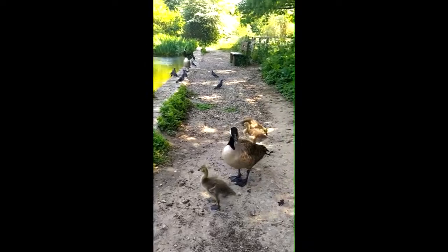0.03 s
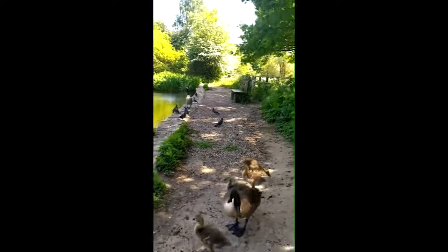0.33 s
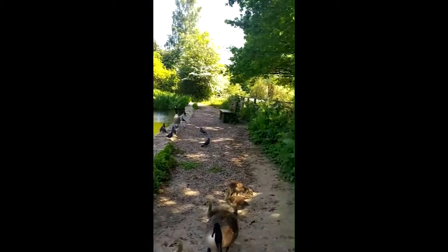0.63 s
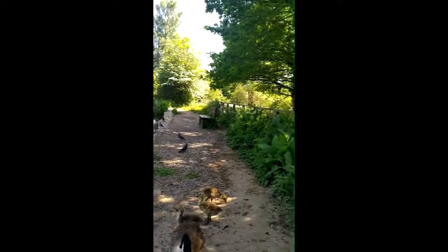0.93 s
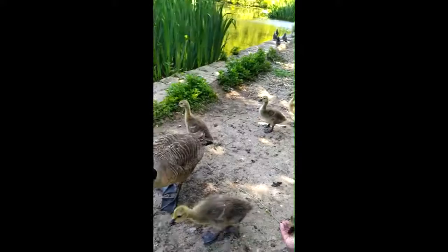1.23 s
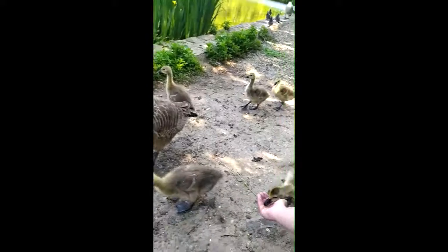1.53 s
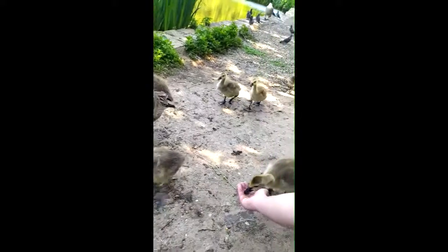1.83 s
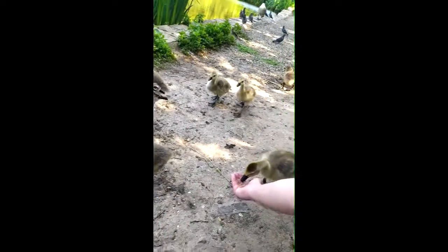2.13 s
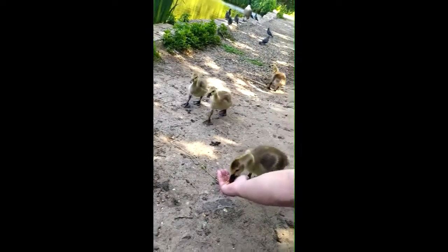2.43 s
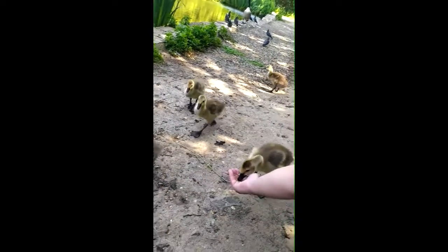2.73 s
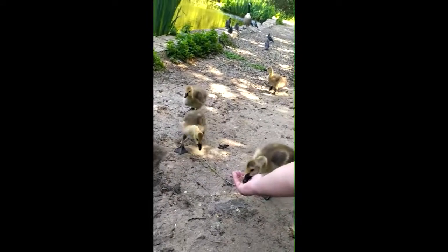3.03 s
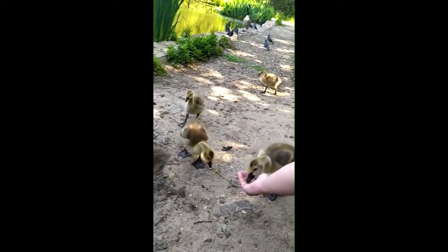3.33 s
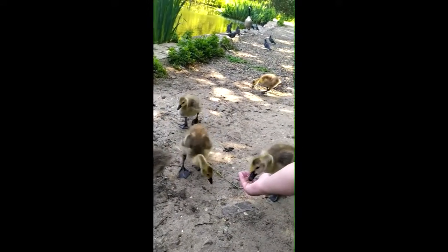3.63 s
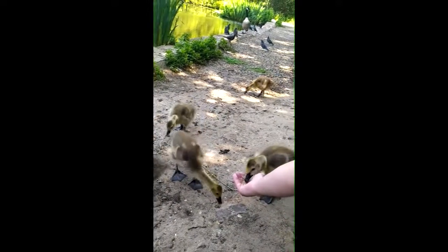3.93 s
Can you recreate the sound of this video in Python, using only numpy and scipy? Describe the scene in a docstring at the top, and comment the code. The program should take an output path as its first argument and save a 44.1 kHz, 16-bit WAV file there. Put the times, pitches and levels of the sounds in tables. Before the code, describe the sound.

A breathy goose hiss gives way suddenly to thin, wavering gosling peeps outdoors by a pond. Faint rough caws, light scuffs and clicks of grit come through as gusts rumble on the microphone.

```python
"""A goose walks up a gritty pond-side path and hisses, forcing air through its open beak.
After an abrupt cut, goslings peep and trill in thin, unsteady tones and nibble feed from a hand,
while a harsh-voiced bird, perhaps a crow, rattles rough pulses through its throat in the trees.
Throughout, grit snaps and wind buffets the two microphone ports over distant air and a fine rustle."""
import sys
import numpy as np
from scipy import signal
from scipy.fft import rfft, irfft, next_fast_len
from scipy.io import wavfile
from scipy.ndimage import map_coordinates

SR = 44100
rng = np.random.default_rng(int(sys.argv[2]) if len(sys.argv) > 2 else 0)


def wav_out(sig):
    """Save sig, one row per channel (or a flat mono array), as 16-bit PCM at SR to the path in sys.argv[1]."""
    wavfile.write(sys.argv[1], SR, np.round(np.clip(np.atleast_2d(sig).T, -1, 1) * 32767).astype(np.int16))


N = 176400
T = np.arange(N) / SR
CUT_S, GAP_S = 1.264, .009  # the cut from goose to goslings

# Tone of distant trees and town: freq_hz, gain_db
AIR_EQ = [(100, 11.5), (400, 2.5), (850, 11), (1300, 2.5), (2500, -1.5), (5000, -7.5), (16000, -53.5)]
# Tone of the leafy rustle: freq_hz, gain_db
RUSTLE_EQ = [(1000, -1), (3000, -3.5), (5500, -1), (8500, 4.5), (11000, 3), (15500, 0)]
# Fader ride of the rustle: time_s, left_db, right_db
RUSTLE_RIDE = [(0, -49, -47.5), (.5, -49, -50), (1.3, -44, -47.5), (1.6, -46, -50), (1.78, -46, -49),
               (1.95, -45.5, -42.5), (2.07, -41.5, -44.5), (2.12, -48, -52), (2.4, -46.5, -48),
               (2.6, -48.5, -52), (3.1, -49.5, -52.5), (3.7, -53, -56), (4, -51.5, -54.5)]
# Tone of the wind rumble: freq_hz, gain_db
RUMBLE_EQ = [(20, -28), (32, -9), (48, 5), (70, 5), (130, -1.5), (200, -13.5), (300, -24), (600, -35),
             (1500, -55)]
# Fader ride of the rumble: time_s, left_db, right_db
RUMBLE_RIDE = [(0, -27, -31.5), (1.2, -30.5, -30.5), (1.6, -31.5, -36.5), (1.85, -40, -34),
               (2.1, -33.5, -28.5), (2.6, -43.5, -36.5), (2.9, -29.5, -31), (3.5, -38, -34),
               (4, -38.5, -38)]
# Tone of the small eddies between gusts: freq_hz, gain_db
EDDY_EQ = [(20, -38), (60, 12.5), (150, -0.5), (250, -4), (450, -26), (1000, -44)]
# Gusts striking a port: start_s, length_s, level_db, brightness_hz, port (0 left, 1 right)
GUST_CUES = [(.045, 0.023, -31, 230, 0), (.1, 0.3, -31, 141, 0), (0.696, 0.085, -19.5, 189, 0),
             (0.787, 0.089, -19, 295, 0), (0.872, 0.11, -20.5, 154, 0), (0.985, 0.073, -24.5, 115, 0),
             (1.065, 0.046, -17.5, 318, 0), (1.116, 0.084, -13, 470, 0), (1.197, 0.019, -13.5, 430, 0),
             (1.221, 0.046, -15.5, 458, 0), (2.025, 0.03, -28, 109, 0), (2.318, 0.073, -23, 175.7, 0),
             (2.703, .025, -30.5, 89, 0), (3.003, 0.036, -33, 140.7, 0), (0.082, 0.1, -34, 214, 1),
             (0.138, 0.054, -18.5, 292, 1), (0.439, 0.032, -18, 150, 1), (0.642, 0.021, -15, 119, 1),
             (0.688, 0.07, -18, 84.5, 1), (0.902, 0.041, -13, 140, 1), (0.943, 0.018, -14, 215, 1),
             (0.962, 0.1, -26, 110, 1), (1.012, 0.027, -13, 245, 1), (1.336, 0.11, -17.5, 166, 1),
             (1.418, .016, -20.5, 240, 1), (1.868, 0.042, -25.5, 79, 1), (1.968, 0.22, -20.5, 89, 1),
             (2.019, 0.021, -18, 215, 1), (2.142, 0.031, -16, 118, 1), (2.242, 0.035, -28, 79, 1),
             (2.345, 0.042, -25.5, 118.7, 1), (2.432, 0.074, -26.5, 69.6, 1), (2.612, 0.031, -22, 76, 1),
             (2.71, 0.033, -27.5, 78, 1), (2.805, 0.062, -21, 74, 1), (3.184, 0.025, -24.5, 146, 1),
             (3.223, 0.027, -23, 80, 1), (3.492, 0.028, -21, 82, 1)]
# Snaps of grit, and from 2.18 s on mostly sharp nibbles of goslings' bills: start_s, level_db,
# left_over_right_db
SNAP_CUES = [(.092, -35, 16), (0.186, -29.5, 1), (0.2471, -26, 17), (0.3176, -29.5, 21), (0.379, -31.5, 18),
             (0.5, -38, 12), (0.522, -37, 5), (0.999, -21, 8), (1.3996, -27, 11), (1.4477, -28, 20),
             (1.854, -33, 7.5), (2.184, -38, 10), (2.354, -35, 1), (2.5823, -37, 16), (2.731, -40, 11),
             (2.834, -38.5, 9.5), (3.094, -39, 5), (3.445, -35.5, 14), (3.5744, -41, 8), (3.6284, -35.5, 5),
             (3.7148, -40, 3), (3.9144, -46, 9.5), (3.959, -41, 9)]
# Tone of a snap: freq_hz, gain_db
SNAP_EQ = [(1000, -18), (2800, -3), (4000, -4), (8000, 5.5), (12000, 6), (16000, -2.5)]
# Webbed feet scuffing and bills nibbling: start_s, length_s, level_db
SCUFF_CUES = [(0.051, 0.022, -46.5), (0.09, 0.02, -43), (0.109, 0.055, -50), (0.233, 0.019, -46.5),
              (1.387, 0.056, -45.5), (1.558, 0.033, -54), (1.654, 0.065, -44.5), (1.773, 0.23, -54),
              (3.216, 0.024, -48.5), (3.266, 0.023, -50.5), (3.328, 0.03, -49), (3.38, 0.028, -52),
              (3.447, 0.011, -51), (3.497, 0.02, -52.5), (3.571, 0.018, -52), (3.863, 0.14, -57.5)]
# Tone of scuffs and nibbles: freq_hz, gain_db
SCUFF_EQ = [(800, -2), (2500, 1.5), (4000, 2), (7000, 7.5), (10000, 11.5), (13000, -1), (16000, -30)]
# Caws: start_s, length_s, pitch_hz, level_db, roughness, lower_resonance_hz, upper_resonance_db
CAW_CUES = [(1.245, 0.22, 378.3, -49.5, 0.75, 1120, -12.5), (1.472, 0.43, 418, -52.5, 0.96, 1260, -35),
            (1.818, 0.14, 372, -46, 0.62, 1346, -8), (1.952, .13, 363.2, -51.5, 0.85, 1800, -27),
            (2.934, 0.103, 356, -57.5, .85, 1670, -3), (3.023, .1, 350, -55.5, 1.1, 1780, -12),
            (3.128, 0.085, 343.5, -58, 1, 1620, -22)]
# Resonances of the crow's throat: freq_hz, gain_db
CROW_EQ = [(400, -31), (750, -7), (950, -25), (1120, -3.5), (1450, 1), (1850, 3), (2100, -2.5), (2400, -6),
           (2700, -5.5), (3300, -6), (4000, -25), (8000, -25)]
# Resonances of a gosling's throat: freq_hz, gain_db
GOSLING_EQ = [(910, 5), (1250, 1), (1480, 4), (1700, 0), (1930, 5.5), (2150, -3), (2400, -12), (2900, 5),
              (3400, 4), (4600, -20)]
# A gosling's harmonics, fundamental first: gain_db
GOSLING_HARMONICS = [0, -22, -34]
# Contour of the trill: time_s, pitch_hz, level_db
TRILL_CONTOUR = [(1.835, 1745, -49), (1.903, 1880, -47), (1.934, 1850, -43.5), (1.968, 1792, -41.5),
                 (2.008, 1717, -42), (2.038, 1553, -48.5), (2.074, 1370, -51)]
# Gosling peeps: start_s, rise_s, fall_s, first_hz, top_hz, last_hz, level_db, left_over_right_db
PEEP_CUES = [(1.335, 0.11, 0.067, 1450, 2350, 1123, -41, 3),
             (1.59, 0.1, 0.055, 1480, 2446, 1337, -39.5, 0.5),
             (2.159, 0.06, .052, 1034, 1400, 1030, -57.5, -3),
             (2.336, 0.059, 0.061, 1134, 1563, 1230, -52, -1),
             (2.497, .064, 0.07, 1064, 1557, 1240, -52.5, 4),
             (2.675, 0.047, 0.072, 1136, 1630, 1235, -45.5, 12),
             (2.854, 0.049, 0.049, 1090, 1705, 1080, -45.5, 13)]
# Resonances of the goose's open beak: freq_hz, gain_db
BEAK_EQ = [(1760, -16), (3000, -18), (4490, -7), (5050, -9), (5570, -6.5), (7050, -6.5), (8280, 1),
           (10200, 5.5), (11100, 1), (13300, -2), (15800, -12)]
# Fader ride of the hiss: time_s, level_db
HISS_RIDE = [(.52, -63), (.555, -45.5), (.72, -42.5), (.89, -44.5), (.93, -40), (.99, -41.5), (1.03, -41),
             (1.075, -42), (1.11, -46), (1.27, -45)]
# Treble roll-off of the right port: freq_hz, gain_db
RIGHT_PORT_EQ = [(1000, 0), (6000, 0), (10000, -6), (12500, -9), (16000, -18)]


def amp(db):
    """Decibels to gain."""
    return 10 ** (np.asarray(db) / 20)


def unit(x):
    """Scale to rms 1."""
    return x / np.sqrt(np.mean(x ** 2, axis=-1, keepdims=True) + 1e-20)


def eq_gain(eq, hz):
    """Gain of an EQ curve at hz, read on a log frequency axis."""
    freq_hz, gain_db = np.transpose(eq)
    return amp(np.interp(np.log(hz + 1), np.log(freq_hz + 1), gain_db))


def curves(rows):
    """One automation curve for each column after the time."""
    time_s, *columns = np.transpose(rows)
    return np.array([np.interp(T, time_s, column) for column in columns])


def wobble(rate):
    """A smooth random curve, rate knots a second."""
    return map_coordinates(rng.standard_normal(int(N * rate / SR) + 4), [T * rate / SR])


def filtered(x, response):
    """Filter x by a function of frequency."""
    n = x.shape[-1]
    padded = next_fast_len(n + 8192)
    return irfft(rfft(x, padded) * response(np.fft.rfftfreq(padded, 1 / SR)), padded)[..., :n]


def noise(eq):
    """Two unrelated channels of coloured noise, rms 1."""
    return unit(filtered(rng.standard_normal((2, N)), lambda hz: eq_gain(eq, hz)))


def window(start, length, edge_s):
    """Smooth attack, hold and release."""
    inside_s = np.minimum(T - start, start + length - T)
    return np.sin(np.pi / 2 * np.clip(inside_s / edge_s + .5, 0, 1)) ** 2


def pan(left_over_right_db):
    """Left and right gains of mean power 1."""
    gains = amp([[left_over_right_db / 2], [-left_over_right_db / 2]])
    return gains / np.sqrt(np.mean(gains ** 2))


def ambience():
    """A bed of distant air and a fine, crackly rustle."""
    crackle = unit(amp(1.8 * wobble(500) + 1.6 * wobble(45)))
    return amp(-57) * noise(AIR_EQ) + noise(RUSTLE_EQ) * amp(curves(RUSTLE_RIDE)) * crackle


def wind(attack_s=.01116, fade_s=.017, slope_db=10.5, low_cut_hz=44.4):
    """A restless rumble on both ports; each lumpy gust strikes one port and brightens as it surges."""
    rumble = unit(noise(RUMBLE_EQ) * amp(3.5 * np.array([wobble(18), wobble(18)])))
    eddies = unit(noise(EDDY_EQ) * amp(6 * np.minimum([wobble(45), wobble(45)], 2)))
    out = rumble * amp(curves(RUMBLE_RIDE)) + amp(-46.5) * eddies
    for start, length, db, bright_hz, port in GUST_CUES:
        attack = np.interp(T, [start - attack_s / 2, start + attack_s / 2], [0, 1])
        envelope = attack * np.clip((start + length - T) / fade_s + .5, 0, 1)
        on = np.flatnonzero(envelope)
        tilt = lambda hz: amp(-slope_db * hz / bright_hz) * hz ** 4 / (hz ** 4 + low_cut_hz ** 4)
        turbulence = filtered(rng.standard_normal(SR // 2), tilt)
        lows = filtered(turbulence, lambda hz: 1 / (1 + (hz / bright_hz) ** 4))[:len(on)]
        highs = turbulence[:len(on)] - lows
        surge = unit(np.abs(np.hanning(len(on))) ** .5 * amp(3 * wobble(110)[on]))
        gust = unit((lows + highs * surge) * envelope[on])
        gate = (start > CUT_S) | (T[on] < CUT_S)  # no gust carries over the cut
        out[int(port), on] += amp(db) * gust * gate
    return out


def grit(snap_t60_s=.018, snap_trim_db=-1.5):
    """Single bright snaps of grit and sharp nibbles, and grainy scuffs and nibbles off to the left."""
    snaps = sum(amp(db + snap_trim_db - 60 * np.abs(T - start) / snap_t60_s) * (T >= start) * pan(side)
                for start, db, side in SNAP_CUES)
    strokes = sum(amp(db) * window(start, length, edge_s=.002) for start, length, db in SCUFF_CUES)
    grains = unit(amp(6 * np.minimum(wobble(700), 2)))
    return snaps * noise(SNAP_EQ) + strokes * grains * noise(SCUFF_EQ) * pan(12.5)


def tree_echo(x, t60_s=.32, predelay_s=.004):
    """A short scattered echo from the bank and trees."""
    t = T[:SR // 2]
    tail = rng.standard_normal((2, len(t))) * amp(-60 * t / t60_s) * (t > predelay_s)
    return signal.fftconvolve(x.mean(0)[None], tail / np.linalg.norm(tail[0]), axes=1)[:, :N]


def resonance(source, centre_hz, width_hz):
    """The source ringing in one throat resonance, rms 1."""
    return unit(filtered(source, lambda hz: 1 / (1 + 2j * (hz - centre_hz) / width_hz) ** 2))


def crow(rattle_hz=34.9, upper_hz=2962):
    """Rattling pulses and breath through a throat; two of its resonances widen with roughness."""
    out = np.zeros((2, N))
    for start, length, pitch_hz, db, roughness, lower_hz, upper_db in CAW_CUES:
        sag = .04 * np.clip(2 * (T - start) / length - 1, -1, 1) ** 2  # pitch droops at both ends
        cycles = np.cumsum(pitch_hz * (1 - sag + .014 * wobble(220))) / SR
        pulses = unit(np.diff(np.floor(cycles), prepend=0))
        noise_share = np.clip(roughness, .1, 1)
        source = np.sqrt(1 - noise_share) * pulses + np.sqrt(noise_share) * rng.standard_normal((2, N))
        throat = unit(filtered(source, lambda hz: eq_gain(CROW_EQ, hz)))
        lower = resonance(source, lower_hz, width_hz=320 * noise_share)
        upper = resonance(source, upper_hz, width_hz=360 * noise_share ** 2)
        voice = unit(throat + amp(-5.5) * lower) + amp(upper_db) * upper
        rattle = 1 + .35 * np.cos(2 * np.pi * rattle_hz * (T - start))
        out += amp(db) * voice * rattle * window(start, length, edge_s=.041)
    return out


def gosling_voice(pitch_hz, strain, rasp=.17, right_lag_s=.00014):
    """A thin tone coloured by the throat; strain (0-1) makes it waver, crack, weaken and turn airy."""
    waver = .011 * wobble(250) + .019 * strain * wobble(110)
    cycles = np.cumsum(pitch_hz * (1 + waver)) / SR - pitch_hz * np.array([[0], [right_lag_s]])
    crack = .85 * strain * wobble(600)
    phase = 2 * np.pi * cycles + crack + rasp * wobble(700)
    tone = sum(np.sin(k * phase) * amp(db) * eq_gain(GOSLING_EQ, k * pitch_hz)
               for k, db in enumerate(GOSLING_HARMONICS, 1))
    flutter_db = (1.5 + 5 * strain) * np.minimum(wobble(90), 1.3) - 2 * strain
    # A band of airy noise follows the pitch.
    breath = np.array([np.sin(side) * wobble(900) + np.cos(side) * wobble(900) for side in phase])
    grain = 1 + (rasp + strain / 4) * wobble(700)
    return np.sqrt(2) * tone * amp(flutter_db) * grain + amp(-4) * strain * breath


def gosling_trill(crest_s=1.935, pulse_hz=32, slowing_hz_per_s=75, depth=.63):
    """One longer call that lifts, then falls in pitch, pulsing ever more slowly."""
    pitch_hz, db = curves(TRILL_CONTOUR)
    start, end = TRILL_CONTOUR[0][0], TRILL_CONTOUR[-1][0]
    t = T - crest_s
    tremolo = 1 - depth * np.sin(np.pi * (pulse_hz - slowing_hz_per_s * t / 2) * t) ** 2
    envelope = amp(db) * window(start, end - start, edge_s=.0083)
    return gosling_voice(pitch_hz, strain=.5) * tremolo * envelope


def gosling_peeps(catch_db=-6.5, catch_s=.0096):
    """Each peep arches in pitch, swells, catches at the top and fades; high notes strain the voice."""
    pitch_hz, gain = np.full(N, 1000.), np.zeros((2, N))
    for start, rise, fall, first_hz, top_hz, last_hz, db, side in PEEP_CUES:
        on = (T > start) & (T < start + rise + fall)
        t = T[on] - start
        from_top = np.abs(t - rise) / np.where(t < rise, rise, fall)
        pitch_hz[on] = top_hz - (top_hz - np.where(t < rise, first_hz, last_hz)) * from_top ** 1.5
        swell = np.abs(np.sin(np.pi * t / (rise + fall))) ** .78
        catch = amp(catch_db * np.exp(-((t - rise) / catch_s) ** 2))
        gain[:, on] = amp(db) * swell * catch * pan(side)
    return gain * gosling_voice(pitch_hz, strain=np.interp(pitch_hz, [1500, 2300], [0, 1]))


def goose_hiss(bounce_gain=.21, bounce_s=.0012):
    """Air rushes through the open beak; its bounce off the path comb-filters the hiss."""
    level_db, = curves(HISS_RIDE)
    air = noise([(1500, -8.5)] + list(BEAK_EQ))  # a low shelf gives the hiss body
    hiss = filtered(air, lambda hz: 1 + bounce_gain * np.exp(-2j * np.pi * hz * bounce_s))
    flutter_db = .9 * wobble(45)
    gate = (T > HISS_RIDE[0][0]) & (T < CUT_S)
    return hiss * amp(level_db + flutter_db) * gate * pan(11)


def scene():
    """Goose before the cut, goslings and crow after it; grit, wind and ambience throughout."""
    calls = (gosling_peeps() + gosling_trill() + crow()) * (T > CUT_S)
    return calls + amp(-6) * tree_echo(calls) + goose_hiss() + grit() + wind() + ambience()


def record(dry, low_cut_hz=40.4, high_cut_hz=15900):
    """The microphone's duller right port and band limits, with a blink of silence at the cut."""
    right = filtered(dry[1], lambda hz: eq_gain(RIGHT_PORT_EQ, hz))
    ports = filtered(np.array([dry[0], right]), lambda hz: hz ** 8 / (hz ** 8 + low_cut_hz ** 8))
    mute = 1 - window(CUT_S, GAP_S, edge_s=.0015)
    return filtered(ports * mute, lambda hz: hz < high_cut_hz)


dry = scene()
out = record(dry)
wav_out(out)
```